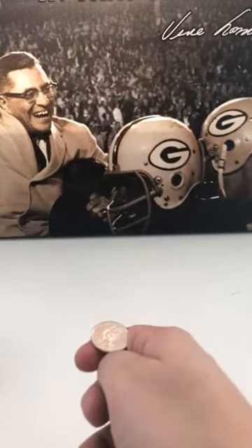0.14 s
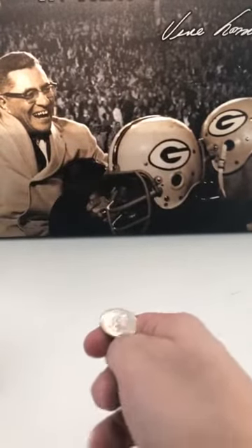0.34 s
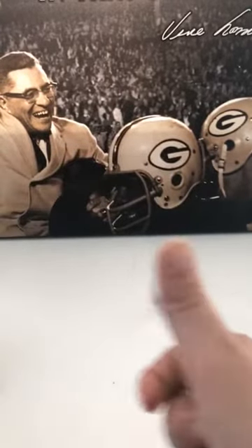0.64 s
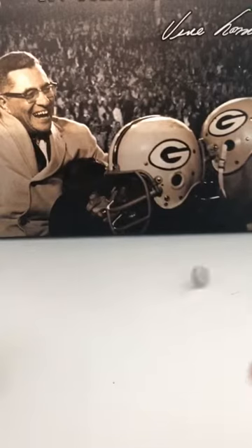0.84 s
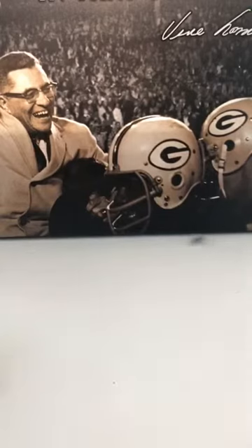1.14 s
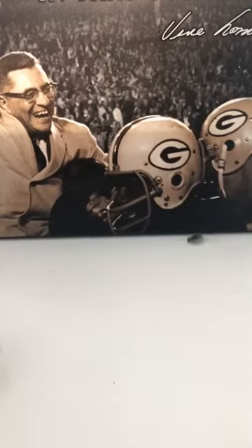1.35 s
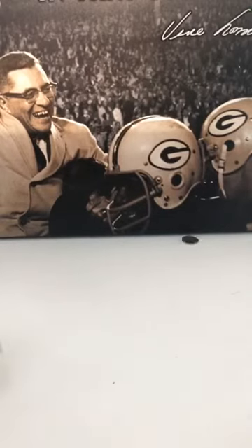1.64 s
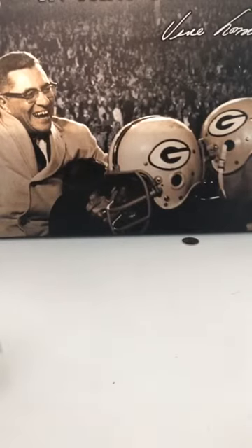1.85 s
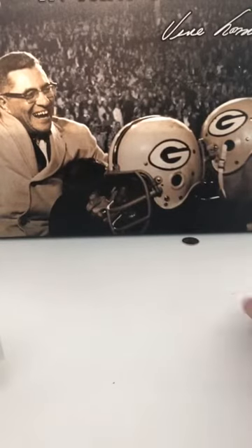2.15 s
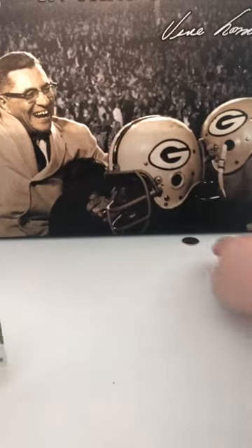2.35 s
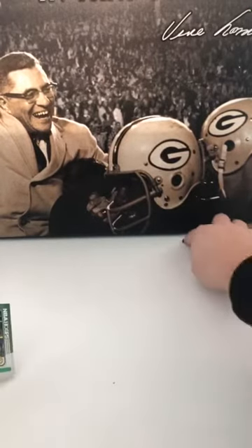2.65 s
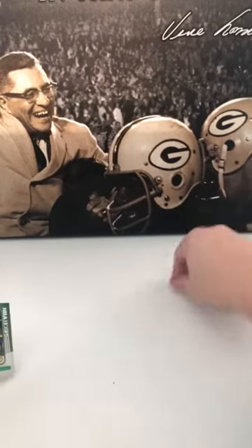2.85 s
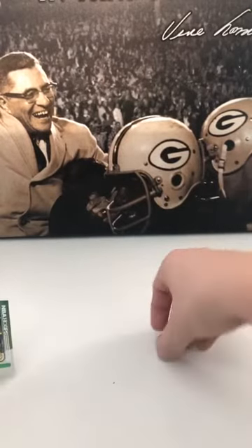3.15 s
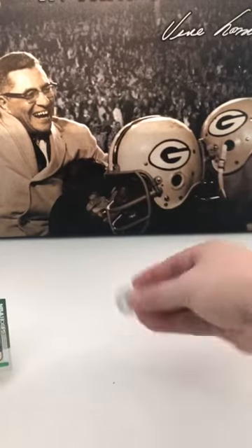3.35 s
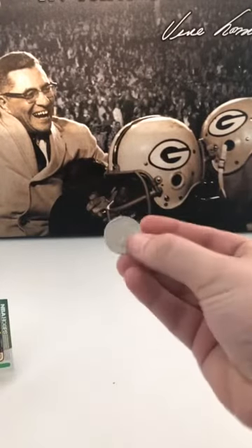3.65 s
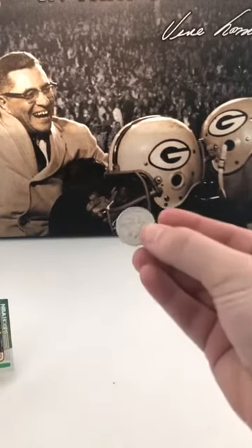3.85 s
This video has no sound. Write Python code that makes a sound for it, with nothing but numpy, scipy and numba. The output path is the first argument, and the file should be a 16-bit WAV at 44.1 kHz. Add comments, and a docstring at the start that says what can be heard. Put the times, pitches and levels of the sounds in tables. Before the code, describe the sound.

A coin is flicked with a faint ring, bounces on a hard table, rolls with a wobble and slaps flat. It is dragged back and clicks sharply between the fingers, close by in a small, quiet room.

```python
"""A coin is flicked off a thumb with a faint ring, lands on a hard table with a noisy wash and bounces.
It rolls with a wobble and slaps flat, and each hit makes the tabletop ring.
A sleeve swishes and an arm bumps the table, then the coin is dragged back and tipped up.
Last, it clicks sharply between the fingers. All this is close by, in a small, quiet room."""
import sys
import numpy as np
from scipy import signal
from scipy.fft import rfft, irfft
from scipy.io import wavfile
from numba import njit

SR = 44100
rng = np.random.default_rng(int(sys.argv[2]) if len(sys.argv) > 2 else 0)


def int16_out(signal):
    """Quantize to a 16-bit WAV file."""
    q = np.round(np.clip(np.atleast_2d(signal).T, -1, 1) * 32767)
    wavfile.write(sys.argv[1], SR, q.astype(np.int16))


N = 176400
t = np.arange(N) / SR
freqs = np.arange(N // 2 + 1) * SR / N + 1e-3

# The coin hits the table: start_s, gain_db, treble_cutoff_hz, extra_boom_db
HITS = [(0.669, 4, 3900, -4.5), (0.7385, 0.5, 3400, -3.5), (0.7522, -5, 2800, 3), (0.852, 4, 2390, 1.5),
        (0.8893, 1, 2344, -6.5), (0.923, -5, 2450, -2.5), (0.947, -7, 2530, 6), (.9662, -11, 2300, 1.5),
        (0.976, -24.5, 1800, -8), (1.683, -0.5, 5500, -8), (1.7218, -5, 5200, -11.5),
        (1.744, -14, 4370, -7.5), (1.7581, -12.5, 4300, -10.5), (2.659, -27.5, 2915, 7.5),
        (3.265, -22.5, 2470, -28)]
# Tone of the crack of a hit: frequency_hz, gain_db
CRACK_TONE = [(60, -23), (450, -4), (850, -6.5), (1300, 1), (3200, -1.5), (5000, -6), (7000, -8),
              (9000, -6)]
CRACK_DB, BEND_LAG_S = 21.5, .0013
def bounces():
    """Each hit bends the tabletop: a crack travels through it, treble first, and it booms."""
    crack, push = np.zeros(N), np.zeros(N)
    for start_s, db, cutoff_hz, boom_db in HITS:
        add(crack, start_s, undb(db) * cut(burst(hold_s=.003, fall_s=.0016), cutoff_hz, "low"))
        add(push, start_s, undb([db + boom_db]))
    # Below 4000 Hz, lower sounds arrive later.
    lag_s = BEND_LAG_S * np.maximum(np.sqrt(1000 / np.maximum(freqs, 50)) - np.sqrt(1000 / 4000), 0)
    bent = irfft(rfft(crack) * np.exp(-2j * np.pi * np.cumsum(lag_s) * SR / N), N)
    return undb(CRACK_DB) * shape(bent, gains(CRACK_TONE)) + tabletop(push)


# The tabletop's own notes: pitch_hz, gain_db
TABLE_NOTES = [(74, -24.5), (140, -17.5), (200, -12), (260, -10), (330, -10), (460, 4), (548, -6.5),
               (689, 3.5), (990, -2.5), (1050, 0.5), (1240, 1.5), (1342, -6.5), (1470, -3), (1554, 5),
               (1793, -4.5), (2240, -2.5), (2590, -3.5), (3150, -8.5), (3465, -5.5), (4120, -13.5)]
def tabletop(force):
    """A push makes all the tabletop's notes ring at once."""
    return undb(-29.5) * ring(force, notes(TABLE_NOTES, ring_s=.21, damping=.083))


# The coin's own notes: pitch_hz, ring_s (time to fade by 60 dB)
COIN_NOTES = [(8786, 1.8), (9130, 3.6), (9819, .8)]
# The coin is set ringing: start_s, low_note_db, middle_note_db, high_note_db
COIN_RINGS = [(.416, -80, -61.5, -90.5), (.738, -58.5, -57.5, -34), (0.853, -43, -71.5, -69.5)]
SPIN_HZ, FACING_S, SPIN_DEPTH = 11, .82, .42
def coin_ring():
    """The coin's thin ring swells each time a face spins toward the listener; rolling stops it."""
    out, age = np.zeros(N), t[:N // 4]
    for start_s, *levels in COIN_RINGS:
        for (hz, ring_s), db in zip(COIN_NOTES, levels):
            fade = np.exp(-np.log(1000) * age / ring_s)
            add(out, start_s, undb(db) * fade * np.sin(2 * np.pi * hz * age))
    spin = 1 + SPIN_DEPTH * np.cos(2 * np.pi * SPIN_HZ * (t - FACING_S))
    damped_by_rolling = np.exp(-np.maximum(t - .98, 0) / .11)
    return out * spin * damped_by_rolling


# Tone of the wash: frequency_hz, gain_db
WASH_TONE = [(60, -11.5), (450, -1), (3100, -2.5), (4900, -7), (7700, -23), (9200, -13), (10500, -20.5)]
def landing_wash():
    """A dense, noisy wash follows the first hit and quickly fades."""
    rise = np.clip((t - .683) / .0024, 0, 1)
    fall = np.exp(-np.maximum(t - .703, 0) / .038)
    wash = unit(shape(grit(per_second=2500, spread_db=-1.5), gains(WASH_TONE)))
    return undb(-16.5) * rise * fall * wash


# Tone of the rolling rim: frequency_hz, gain_db
ROLL_TONE = [(80, -23.5), (480, -6.5), (1100, 4.5), (1600, 3.5), (2300, 0), (3900, -7), (5500, -20.5),
             (9500, -28)]
# The leaning coin grinds its rim once per wobble: middle_s, level_db, half_width_s
WOBBLES = [(1.185, -32, 0.019), (1.344, -39, 0.014), (1.383, -28.5, 0.016), (1.487, -26.5, 0.016),
           (1.586, -31, 0.028), (1.651, -35, .008)]
ROLL_START_S, ROLL_DB, ROLL_DB_PER_S = .94, -32, -28
def roll():
    """The rim ticks along dully, fading as it slows; each wobble is louder and brighter."""
    ticks = grit(per_second=3500, spread_db=0)
    rim = rubbed(ticks, ROLL_TONE, table_db=-8.5)
    dull_rim = unit(cut(rim, 1600, "low", order=1))
    level = undb(ROLL_DB + ROLL_DB_PER_S * (t - ROLL_START_S))
    level *= envelope(ROLL_START_S, rise_s=.03, hold_s=.72, fall_s=.01)
    wobble = sum(undb(db) * np.exp(-((t - s) / width_s) ** 2) for s, db, width_s in WOBBLES)
    return level * dull_rim + wobble * rim + undb(-18) * tabletop(ticks * level)


# Tone of the scrape: frequency_hz, gain_db
DRAG_TONE = [(200, -18.5), (800, -17), (1550, 6), (2700, 5.5), (4300, 5), (5500, -12.5), (7000, -14),
             (10000, -21.5)]
# The table's shifting note under the coin: time_s, pitch_hz
DRAG_PITCH = [(2.765, 690), (2.79, 1670), (2.89, 1675), (2.96, 1470), (3.07, 1160), (3.125, 1140),
              (3.14, 475), (3.25, 750)]
# The coin is dragged, then tipped up: start_s, level_db, rise_s, hold_s, fall_s, treble_db
STROKES = [(2.649, -27, 0.21, 0.15, 0.049, 3.5), (3.198, -35.5, 0.022, 0.023, 0.0097, -6),
           (3.252, -35.5, 0.015, 0.0033, 0.0037, -0.5)]
# The tipping coin knocks: start_s, level_db, pitch_hz
KNOCKS = [(3.237, -22.5, 2093), (3.265, -21, 1240)]
def drag():
    """The flat coin catches and slips over the table's grain, then knocks as it tips."""
    catch = undb(unit(cut(rng.standard_normal(N), 59.6, "low")))  # flutter of about 1 dB
    grain = rubbed(catch * grit(per_second=4500, spread_db=2), DRAG_TONE, table_db=-8)
    body, treble = cut(grain, 3450, "low", order=4), cut(grain, 4850, "high", order=4)
    ticks = grit(per_second=1000, spread_db=4)
    note = undb(-10.5) * unit(focus(ticks, curve(DRAG_PITCH), width_hz=290))
    out = np.zeros(N)
    for start_s, db, rise_s, hold_s, fall_s, treble_db in STROKES:
        speed = envelope(start_s, rise_s, hold_s, fall_s)
        scrape = body + undb(treble_db) * treble
        out += undb(db) * (speed * scrape + np.sqrt(speed) * note)  # the note lingers at low speed
    for start_s, db, hz in KNOCKS:
        add(out, start_s, notes([(hz, db)], ring_s=.048))
    return out


# Fingernail and coin clicks, plus a dull tap on the table at 3.701 s: start_s, gain_db, pitch_hz, width_hz
CLICKS = [(0.419, -37, 2320, 9700), (3.66, -16.5, 7100, 5000), (3.6655, -12, 7950, 2030),
          (3.668, -15, 4820, 1980), (3.673, -19.5, 4060, 4000), (3.701, -35.5, 840, 700),
          (3.767, -43.5, 3780, 4960), (3.975, -40, 2980, 9200), (3.982, -23, 8100, 3520),
          (3.991, -25, 6160, 5020)]
# Notes of the pinched coin and nail: pitch_hz, gain_db
PINCHED_NOTES = [(2780, 2.5), (3620, 2.5), (4670, 5), (6010, 4.5), (7950, 2)]
CLICK_BOOST_DB = 17
def clicks():
    """Nail and coin snap together, with a short metal ring and a dull thump from the fingers."""
    snaps, thumps = np.zeros(N), np.zeros(N)
    for start_s, db, hz, width_hz in CLICKS:
        contact = burst(hold_s=0, fall_s=.0041)
        snap = focus(contact, np.full(len(contact), float(hz)), width_hz)
        add(snaps, start_s, undb(db + CLICK_BOOST_DB) * snap / np.linalg.norm(snap))
        # Soft skin gives way, so its thump grows more slowly than the snap.
        add(thumps, start_s, undb(db / 2 + CLICK_BOOST_DB) * contact)
    metal = ring(snaps, notes(PINCHED_NOTES, ring_s=.028))
    return snaps + undb(-38) * metal + undb(-20.5) * cut(thumps, 708, "low")


# The arm bumps the table: start_s, level_db, final_pitch_hz
THUDS = [(2.236, -38.5, 35.4), (2.404, -41.5, 34.6), (2.666, -44, 65), (2.89, -35, 75)]
THUD_RISE_S, THUD_GLIDE_S = .015, .013
def arm_thuds():
    """Each bump of the arm is a soft thud that drops in pitch."""
    out, age = np.zeros(N), t[:N // 16]
    for start_s, db, hz in THUDS:
        pitch = hz * (1 + 2 * np.exp(-age / THUD_GLIDE_S))
        swell = age / THUD_RISE_S * np.exp(1 - age / THUD_RISE_S)
        add(out, start_s, undb(db) * swell * np.sin(2 * np.pi * np.cumsum(pitch) / SR))
    return out


# Tone of the sleeve: frequency_hz, gain_db
SLEEVE_TONE = [(500, -4), (3600, -7.5), (9500, -18.5)]
def sleeve(peak_s=2.361, rise_s=.42, fall_s=.17):
    """Cloth brushes along as the arm reaches out."""
    swell = np.exp(np.minimum((t - peak_s) / rise_s, (peak_s - t) / fall_s))
    swish = unit(shape(grit(per_second=12000, spread_db=3), gains(SLEEVE_TONE)))
    return undb(-52) * swell * swish


# Sleeve and fingertip squeak: start_s, length_s, level_db, first_pitch_hz, last_pitch_hz
SQUEAKS = [(2.205, 0.2, -56, 3380, 3890), (3.714, 0.078, -54, 1230, 1360)]
def squeaks():
    """Light rubbing sings a faint, rising note."""
    out = np.zeros(N)
    for start_s, length_s, db, first_hz, last_hz in SQUEAKS:
        progress = np.clip((t - start_s) / length_s, 0, 1)
        pitch = first_hz + (last_hz - first_hz) * progress
        squeak = unit(focus(rng.standard_normal(N), pitch, width_hz=150))
        out += undb(db) * np.sin(np.pi * progress) * squeak
    return out


# The room's echo, band by band: frequency_hz, gain_db, ring_s
ECHO_BANDS = [(150, -7, 0.39), (510, -6.5, 0.4), (1377, -7.5, 0.21), (3700, -7, 0.29), (9700, -3, 0.092)]
def room(x, wall_delay_s=.012, early_db=-4):
    """Nearby things echo weakly, then the walls answer and fade."""
    age, noise, tail = t[:N // 5], rfft(rng.standard_normal(N)), 0
    centres = np.log([row[0] for row in ECHO_BANDS])
    for share, (_, db, ring_s) in zip(np.eye(len(ECHO_BANDS)), ECHO_BANDS):
        band = irfft(noise * np.interp(np.log(freqs), centres, share), N)[:len(age)]
        fade = np.exp(-np.log(1000) * age / ring_s) * np.where(age < wall_delay_s, undb(early_db), 1)
        tail = tail + undb(db) * band * fade / np.linalg.norm(fade)
    return ring(x, tail)


# Tone of the room's air: frequency_hz, gain_db
AIR_TONE = [(12, -32), (20, -8.5), (70, -8.5), (137, -16), (262, -12.5), (359, -19.5), (10000, -44)]
# Loudness of the hum: time_s, level_db
HUM_LEVELS = [(0, -68.5), (1.9, -68.5), (2.55, -52), (2.95, -73)]
def background(hum_hz=264.4, air_db=-61.5):
    """Quiet room air and a faint, wavering hum that swells once."""
    pitch = hum_hz * (1 + .012 * unit(cut(rng.standard_normal(N), 6, "low")))
    hum = undb(curve(HUM_LEVELS)) * np.sin(2 * np.pi * np.cumsum(pitch) / SR)
    return hum + undb(air_db) * unit(shape(rng.standard_normal(N), gains(AIR_TONE)))


def burst(hold_s, fall_s, size=1024, passes=4):
    """One brief, noisy contact, evened out from bass to treble."""
    fade = np.exp(-np.maximum(t[:size] - hold_s, 0) / fall_s)
    x = rng.standard_normal(size) * fade
    for _ in range(passes):
        x = irfft(np.exp(1j * np.angle(rfft(x)))) * fade ** (1 / passes)
    return x / np.linalg.norm(x)


def grit(per_second, spread_db):
    """Many tiny random ticks; the spread makes their strength uneven."""
    ticks = (rng.random(N) < per_second / SR) * rng.choice([-1, 1], N)
    return unit(ticks * undb(spread_db * np.minimum(rng.exponential(size=N), 4)))


def rubbed(ticks, tone, table_db):
    """Tiny ticks heard directly and through the ringing tabletop."""
    direct = unit(shape(ticks, gains(tone)))
    return unit(direct + undb(table_db) * unit(tabletop(direct)))


def notes(table, ring_s, damping=0):
    """Notes fading together: 60 dB in ring_s at 500 Hz; damping makes higher ones shorter."""
    age = t[:N // 5]
    fade = np.log(1000) * age / ring_s
    return sum(undb(db) * np.exp(-fade * (hz / 500) ** damping) * np.sin(2 * np.pi * hz * age)
               for hz, db in table)


def envelope(start_s, rise_s, hold_s, fall_s):
    """Rise smoothly, hold, then die away."""
    rise = np.sin(np.pi / 2 * np.clip((t - start_s) / rise_s, 0, 1)) ** 2
    return rise * np.exp(-np.maximum(t - start_s - rise_s - hold_s, 0) / fall_s)


@njit
def resonance(x, hz, width_hz):
    """Keep the sound near a pitch that may move."""
    out, band_state, low_state = np.empty(len(x)), 0., 0.
    for i in range(len(x)):
        tuning, damping = np.tan(np.pi * min(hz[i], 19000.) / SR), width_hz / hz[i]
        band = (band_state + tuning * (x[i] - low_state)) / (1 + tuning * (tuning + damping))
        band_state = 2 * band - band_state
        low_state += 2 * tuning * band
        out[i] = damping * band
    return out


def focus(x, hz, width_hz):
    """Resonate twice for a clearer pitch."""
    return resonance(resonance(x, hz, float(width_hz)), hz, float(width_hz))


def cut(x, hz, keep, order=2):
    """Keep the "low" or "high" side of a frequency."""
    return signal.sosfilt(signal.butter(order, min(hz, SR / 2 - 100), keep, fs=SR, output="sos"), x)


def gains(tone):
    """Turn a tone table into a gain for every frequency."""
    hz, db = np.array(tone).T
    return undb(np.interp(np.log(freqs), np.log(hz), db))


def shape(x, gain):
    """Give each frequency its gain, without any sound arriving early."""
    cepstrum = irfft(np.log(gain + 1e-6), N)
    cepstrum[1:N // 2] *= 2
    cepstrum[N // 2 + 1:] = 0
    return ring(x, irfft(np.exp(rfft(cepstrum)), N)[:N // 20])


def ring(x, response):
    """Play a sound through an object, given its response to one tap."""
    return signal.oaconvolve(x, response)[:N]


def curve(rows):
    """Join (time_s, value) points with straight lines."""
    return np.interp(t, *np.array(rows).T)


def add(out, start_s, x):
    """Mix a short sound in at a time."""
    i = min(max(int(start_s * SR), 0), N - 1)
    out[i:i + len(x)] += x[:N - i]


def undb(db):
    """Decibels to gain."""
    return 10 ** (np.asarray(db) / 20)


def unit(x):
    """Scale to an average (rms) level of 1."""
    return x / np.sqrt(np.mean(x ** 2))


def scene():
    """Table sounds and hand sounds in the room."""
    table, hand = bounces() + landing_wash() + roll() + drag(), clicks()
    echo = room(table + undb(-6) * hand)
    return (table + hand + echo + coin_ring() + arm_thuds() + sleeve() + squeaks() + background())[None]


def record(dry, ceiling=.76, top_hz=9950):
    """The phone rounds off the loudest peaks and cuts the highest treble."""
    rounded = dry / (1 + (dry / ceiling) ** 6) ** (1 / 6)
    return signal.sosfilt(signal.ellip(12, .2, 90, top_hz, fs=SR, output="sos"), rounded)


dry = scene()
out = record(dry)
int16_out(out)
```